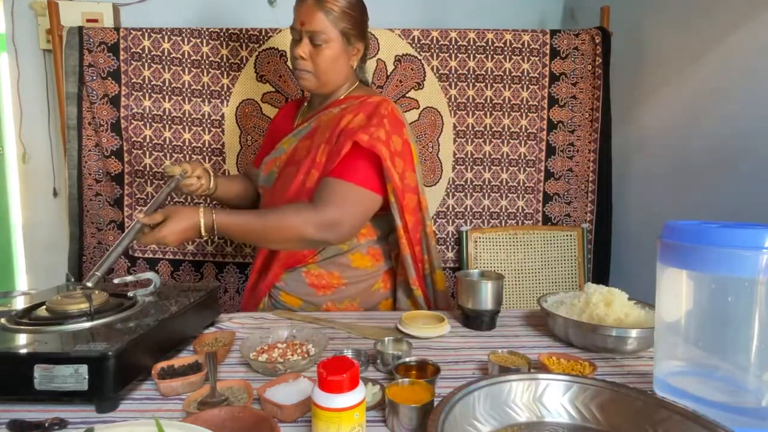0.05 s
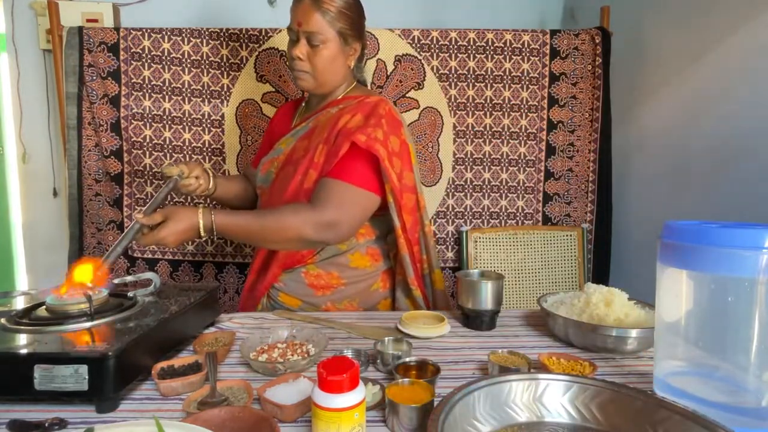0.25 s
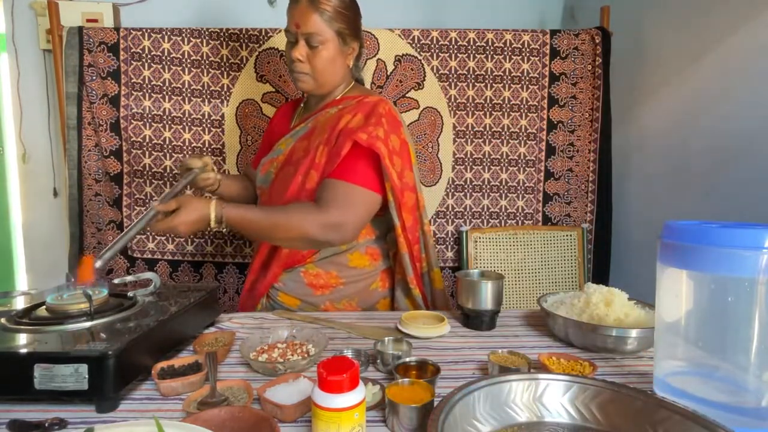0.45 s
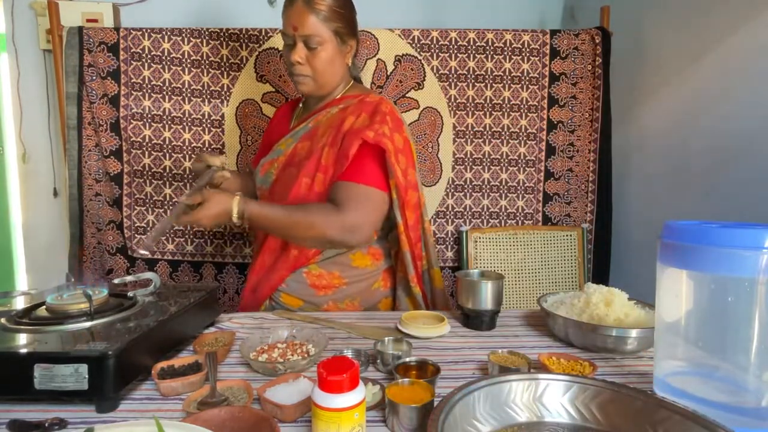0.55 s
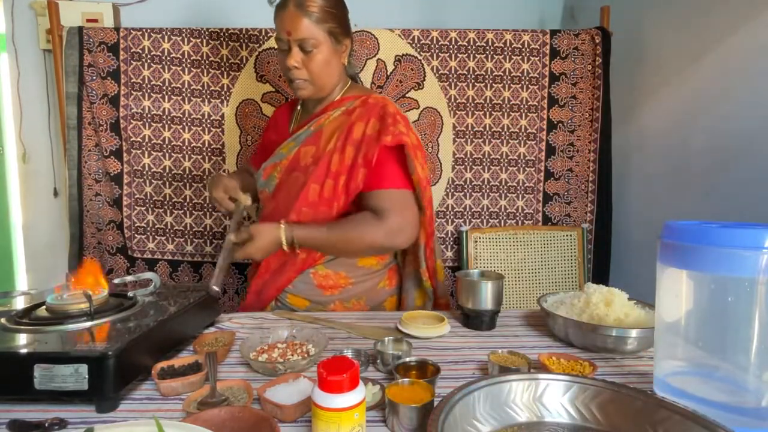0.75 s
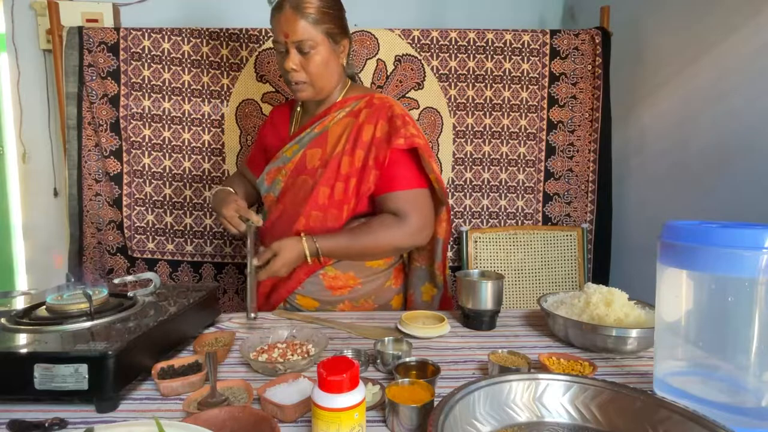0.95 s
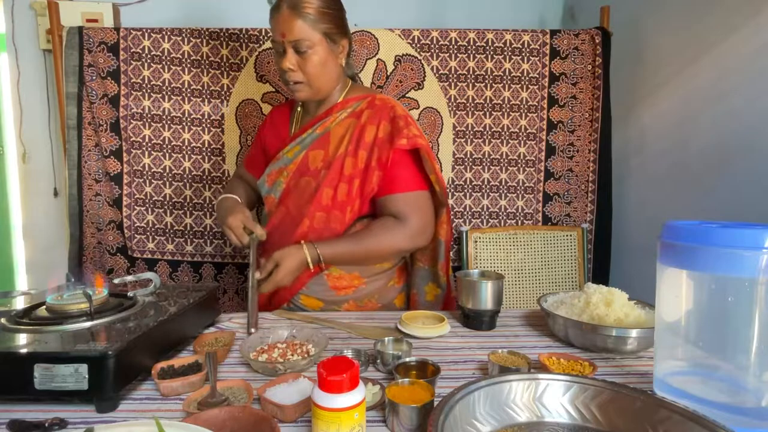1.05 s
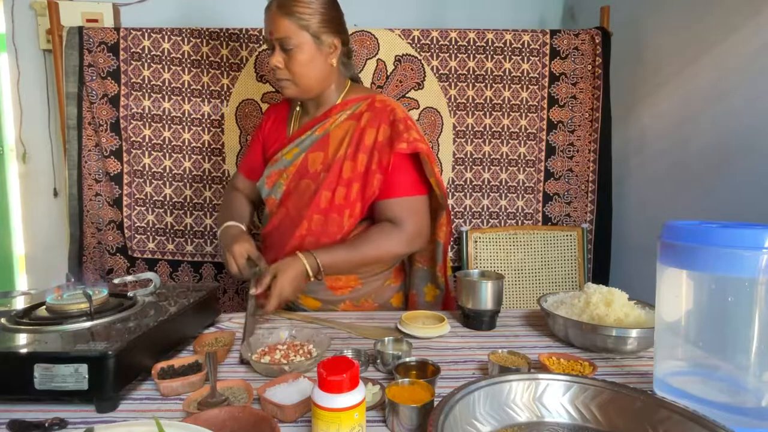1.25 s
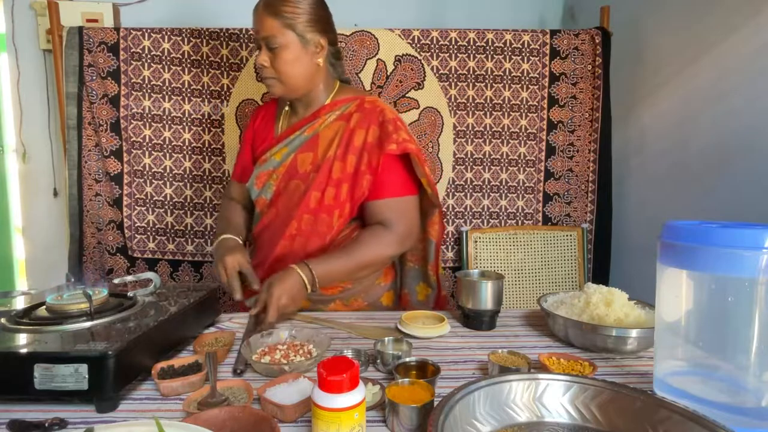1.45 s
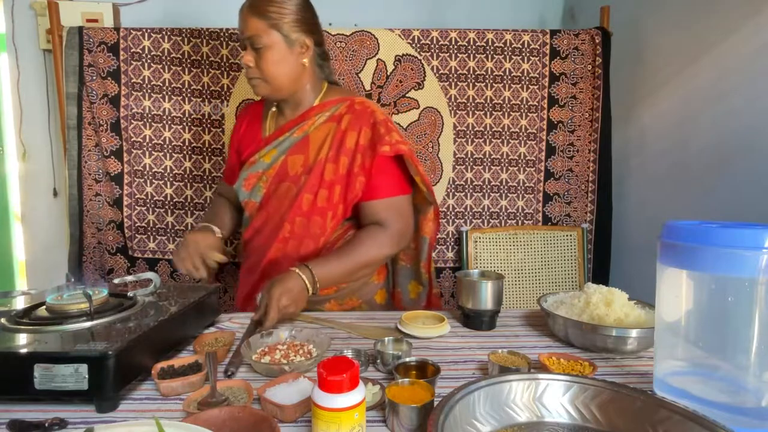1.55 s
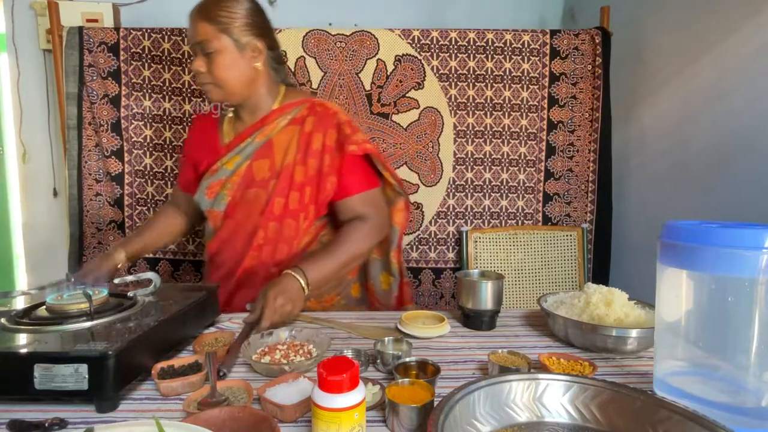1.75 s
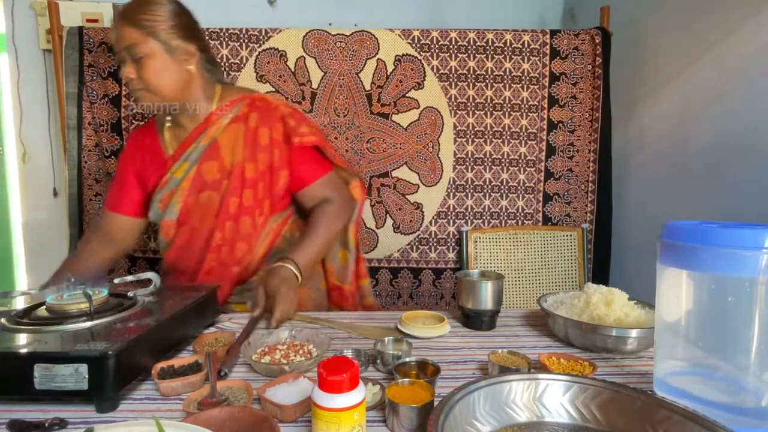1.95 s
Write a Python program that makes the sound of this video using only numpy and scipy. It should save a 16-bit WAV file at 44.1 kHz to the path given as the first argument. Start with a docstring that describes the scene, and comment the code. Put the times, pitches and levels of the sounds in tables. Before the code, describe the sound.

A spark lighter snaps at a gas stove, then clanks down before a ringing steel cookware clink

```python
"""A plunger clicks as a long spark lighter is used at a gas ring in a small, hard-walled kitchen.
Its spring snaps, the gas catches with a soft whump and the lighter clanks back.
Two dull table knocks follow, with a ringing clink of steel cookware between them, then a tink of bangles.
Solid bodies sound as shaped noise for their dense modes and wavering sines for their clear ones.
Each contact's energy feeds the body, which rings down and feeds the room; cloth and hush are coloured noise."""
import sys
import numpy as np
from scipy import signal
from scipy.fft import rfft, irfft
from scipy.io import wavfile

SR = 44100
rng = np.random.default_rng(int(sys.argv[2]) if len(sys.argv) > 2 else 0)


def store_pcm(level_fs):
    """Save levels as 16-bit WAV."""
    pcm = np.round(np.clip(level_fs, -1, 1) * 32767).astype(np.int16)
    wavfile.write(sys.argv[1], SR, np.atleast_2d(pcm).T)


N = 88200
TIME, FREQS = np.arange(N) / SR, np.arange(N // 2 + 1) * SR / N

# the kitchen's reverberation time: (frequency [Hz], t60 [s])
ROOM_T60 = [(90, 0.45), (220, 0.62), (500, 0.49), (1100, 0.57), (2500, 0.46), (6000, 0.43), (9500, 0.4),
            (14000, 0.12)]
CONTACT_S = 0.0044   # usual t60 of the energy a contact delivers

# Contact tables give each level as if the contact's energy were spread over a tenth of a second.


def lighter():
    """Impacts excite modes: the plunger clicks, the spring rattles in its tube, the lighter clanks back."""
    # contacts: (time [s], level [dB])
    clicks = [(.0160, -44), (.0185, -47.5)]
    snaps = [(.2050, -30), (.2105, -34), (.2183, -29), (.2243, -32)]
    clanks = [(.7364, -28.5), (.7422, -34), (.7475, -27.5)]
    # colour of the dense modes: (frequency [Hz], density [dB per Hz])
    plunger_colour = [(280, -3.5), (400, 1.5), (5000, -7.5), (7500, -13.5), (9000, -13), (12500, -17),
                      (15500, -46.5)]
    spring_colour = [(150, -10), (600, -13), (1000, -11.5), (1500, -20.5), (3000, -12), (4100, -12.5),
                     (4800, -5.5), (6950, -3), (7500, -21.5), (8700, -5), (10200, -16.5), (12200, -13),
                     (16000, -33)]
    clank_colour = [(70, -42), (150, -8), (420, -3), (650, -3.5), (1800, -4), (5000, -15.5), (7000, -13.5),
                    (7500, -26.5), (8200, -9.5), (9800, -31.5), (10700, -16.5), (12500, -19.5),
                    (15500, -42.5)]
    # clear modes: (frequency [Hz], level relative to the contact [dB], t60 [s])
    spring_modes = [(4786, -16, 0.17), (6180, -20.5, 0.17), (6970, -12, 0.32), (6982, -14, 0.18)]
    clank_modes = [(222, -12, 0.34), (402, -7.5, 0.11), (484.8, -6, 0.15), (783, -10.5, 0.18),
                   (1435, -16.5, 0.15), (1760, -12, 0.42), (3073, -17.5, 0.08)]

    click = clatter(clicks, plunger_colour, ring_s=0.011, room_db=2, pan_db=0.5)

    # the hard first strike of the spring's hammer
    crack_s = 0.0031
    crack = clatter(snaps[:1], spring_colour, ring_s=crack_s, room_db=-6.5, pan_db=2.5,
                    contact_s=crack_s)
    crack = from_db(-3.5) * crack

    snap = clatter(snaps, spring_colour, ring_s=0.2, room_db=0, pan_db=2.0, low_lag=0.86)
    snap = snap + ring(snaps, spring_modes, room_db=-4.5, pan_db=8.5)

    clank = clatter(clanks, clank_colour, ring_s=0.18, room_db=-3.5, pan_db=1.5, low_lag=0.13)
    clank = clank + ring(clanks, clank_modes, room_db=-6, pan_db=2.0)
    return click + crack + snap + clank


def flame():
    """Sudden combustion: the gathered gas catches just after the spark with a low, swelling whump."""
    # colour of the whump: (frequency [Hz], density [dB per Hz])
    whump_colour = [(35, -5), (120, -9.5), (240, 1), (320, -19.5), (3000, -55)]
    catch_s, level_db, swell_s = 0.208, -45, 0.04
    return clatter([(catch_s, level_db)], whump_colour, ring_s=0.26, room_db=0, pan_db=5.5,
                   contact_s=swell_s, low_lag=0.053)


def cookware():
    """Modal ringing: a steel vessel is struck and bounces once; here and there metal only brushes metal."""
    # strike and bounce, then touches so light that one thin tone sounds: (time [s], level [dB])
    strikes = [(1.1984, -33.5), (1.2440, -48)]
    grazes = [(1.050, -68.5), (1.945, -74)]
    # brushes: (time [s], level [dB], pitch [Hz], spread [frequency ratio], t60 of the contact [s])
    brushes = [(0.395, -51.5, 2635, 1.18, 0.033), (1.745, -64, 1060, 1.85, 0.086)]
    # colour of the vessel's dense modes: (frequency [Hz], density [dB per Hz])
    steel_colour = [(100, -17), (400, -2), (1000, 2), (2600, -6), (3400, -4.5), (4200, -19.5),
                    (8400, -12.5), (12700, -12), (13600, -45)]
    # clear modes, main note and thin tone: (frequency [Hz], level relative to the contact [dB], t60 [s])
    steel_modes = [(643, -15, .3), (1176, -8, 0.17), (3340, -4, 0.032), (5070, -5.5, 0.099),
                   (6070, -26.5, .05), (7170, -17, 0.065), (8247, -13, 0.1), (9560, -13.5, .07),
                   (11120, -8, 0.018), (12350, -1, 0.042)]
    main_note = [(1773.5, 5.5, 0.25)]
    thin_tone = [(3350, -0.5, 0.38)]

    clink = clatter(strikes, steel_colour, ring_s=0.0051, room_db=5.0, pan_db=-0.5)
    clink = clink + ring(strikes, steel_modes, room_db=-4, pan_db=5)
    clink = clink + ring(strikes, main_note, room_db=6.5, pan_db=3.5)   # swells in the room
    clink = clink + ring(grazes, thin_tone, room_db=0, pan_db=1)
    for s, db, hz, spread, length_s in brushes:
        resonance = [(hz / 3, -60), (hz / spread, -16), (hz, 0), (hz * spread, -16), (hz * 3, -60)]
        clink = clink + clatter([(s, db)], resonance, ring_s=0.053, room_db=0.0, pan_db=1.5,
                                contact_s=length_s)
    return clink


def table():
    """Contact stiffness limits bandwidth: the softer a knock on the laden table, the lower its treble ends."""
    # knocks: (time [s], level before the treble is cut [dB], top of the treble [Hz])
    knocks = [(1.142, -44.5, 1020), (1.6046, -42.5, 1530)]
    # colour of the dense modes: (frequency [Hz], density [dB per Hz])
    wood_colour = [(50, -37), (230, -1.5), (450, -4.5), (700, -3), (1300, -19.5)]
    # clear mode: (frequency [Hz], level relative to the contact [dB], t60 [s])
    wood_modes = [(220.8, -3, 0.15)]
    out = 0
    for s, db, top_hz in knocks:
        knock = clatter([(s, db)], wood_colour, ring_s=0.038, room_db=4, pan_db=0.5)
        knock = knock + ring([(s, db)], wood_modes, room_db=-3.5, pan_db=-1)
        soften = signal.butter(8, top_hz, fs=SR, output="sos")
        out = out + signal.sosfilt(soften, knock)
    return out


def bangles():
    """Modal ringing of small rings: clear high tones over a short, fainter touch of dense modes."""
    # touch: (time [s], level [dB])
    tinks = [(1.6735, -48.5)]
    # clear modes: (frequency [Hz], level relative to the contact [dB], t60 [s])
    bangle_modes = [(3200, -22, 0.069), (4550, -27, .05), (5930, -3.5, 0.081), (6820, -15.5, 0.06),
                    (8590, -9.5, 0.081), (9400, -12.5, 0.075), (12770, -16, 0.024)]
    # colour of the touch: (frequency [Hz], density [dB per Hz])
    touch_colour = [(4000, -30), (9000, -18), (13000, 8), (16000, -34)]
    touch = clatter(tinks, touch_colour, ring_s=0.009, room_db=3, pan_db=2)
    return ring(tinks, bangle_modes, room_db=6, pan_db=1.5) + from_db(-8) * touch


def cloth():
    """Friction noise: cloth moving with the arm is broadband noise under smooth swells."""
    # rustles: (time of the peak [s], peak level [dB], half length, one standard deviation [s])
    rustles = [(0.582, -66, .045), (1.098, -65.5, 0.028)]
    # colour of the rustle: (frequency [Hz], density [dB per Hz])
    cloth_colour = [(12000, 3), (15000, -25)]
    swell = sum(from_db(db) * np.exp(-.5 * ((TIME - s) / half) ** 2) for s, db, half in rustles)
    return swell * coloured(cloth_colour)


def room_boom():
    """Room resonance: jolts set the lowest standing waves of the kitchen booming."""
    # jolts: (time [s], level [dB])
    thumps = [(.215, -45), (.745, -48), (1.15, -50), (1.24, -53), (1.61, -54.5)]
    # lowest room modes: (frequency [Hz], level relative to the jolt [dB], t60 [s])
    room_modes = [(92.46, 0, 0.6), (162.9, -1, 0.15)]
    return ring(thumps, room_modes, room_db=5.5, pan_db=0)


def room_hush():
    """Stationary background noise: a steady hush of fixed colour."""
    # colour of the hush: (frequency [Hz], density [dB per Hz])
    hush_colour = [(25, -5.5), (196, -2), (326, -14), (383, -1.5), (515, -23), (2900, -30), (12100, -31),
                   (15000, -54.5)]
    return from_db(-61.5) * coloured(hush_colour, pan_db=1.5)


def clatter(contacts, spectrum, ring_s, room_db, pan_db, contact_s=CONTACT_S, low_lag=.5):
    """High modal density: modes merge into noise with t60 ring_s at 1 kHz, longer the lower they are."""
    # dense modes bunch into random peaks and gaps, wider at higher frequencies
    ragged_db, width_at_1khz_hz = 4.0, 30
    place = 2 * np.sqrt(1000 * FREQS) / width_at_1khz_hz
    bunches = from_db(ragged_db * np.interp(place, np.arange(N), rng.standard_normal(N)))
    noise = rms_one(irfft(rfft(coloured(spectrum, pan_db)) * bunches, N))
    modes = rfft(noise)

    # overlapping bands that add up to the whole, each with its own decay
    centres = [hz for hz, _ in ROOM_T60]
    out = 0
    for hz, share in zip(centres, np.eye(len(centres))):
        band = irfft(modes * at_hz(list(zip(centres, share)), FREQS), N)
        band_ring_s = ring_s * (hz / 1000) ** -low_lag
        direct, echoes = energies(contacts, hz, band_ring_s, room_db, contact_s)
        out = out + band * np.sqrt(direct + echoes)
    return out


def ring(contacts, modes, room_db, pan_db):
    """Interference of echoes: a clear mode is pure at the strike and wavers as the echoes take over."""
    # full wavering, reached where only echoes remain; it is faster the higher the tone
    flutter_db, flutter_hz, flutter_share, phase_wander_rad = 1.84, 25, 0.021, 0.81
    out = 0
    for hz, db, t60 in modes:
        # a pure tone's echoes fade in a share of the room's time
        direct, echoes = energies(contacts, hz, t60, room_db, CONTACT_S, tail_share=0.9)
        blur = np.sqrt(echoes / (direct + echoes))
        phase = 2 * np.pi * (hz * TIME + rng.random())
        rate_hz = flutter_hz + flutter_share * hz
        pair = []
        for wave in (np.sin, np.cos):
            flutter = from_db(flutter_db * blur * drift(rate_hz))
            wander = phase_wander_rad * blur * drift(rate_hz)
            pair.append(flutter * wave(phase + wander))
        tone = rms_one(to_ears(*pair, hz, pan_db))
        out = out + from_db(db) * tone * np.sqrt(direct + echoes)
    return out


def energies(contacts, hz, ring_s, room_db, contact_s, tail_share=1):
    """Energy flow: contacts feed the body, which rings down and feeds the room; direct and echoed power."""
    power = np.zeros(N)
    for s, db in contacts:
        power[int(np.clip(s * SR, 0, N - 1))] += from_db(db) ** 2 * SR / 10
    wet = from_db(room_db) ** 2   # echoed energy relative to direct
    rise_cycles = 6   # a body takes some cycles to answer a contact
    driven = die_away(power, contact_s + rise_cycles / hz)
    direct = die_away(driven, ring_s) / (1 + wet)
    echoes = wet * die_away(direct, tail_share * at_hz(ROOM_T60, hz))
    return direct, echoes


def die_away(power, t60):
    """Exponential decay: energy is spread over a tail that falls 60 dB in t60 seconds."""
    keep = from_db(-120 / (max(t60, 1e-4) * SR))   # twice 60, as this gain acts on power
    return signal.lfilter([1 - keep], [1, -keep], power + 1e-20)


def to_ears(mid, side, hz, pan_db):
    """Interchannel coherence: unrelated signals are mixed to left and right with the room's likeness."""
    # between the channels: (frequency [Hz], correlation [-1 to 1], left minus right before pan_db [dB])
    stereo = [(220, 0.91, 1), (470, 0.022, 1), (1290, -0.17, 3.5), (2520, -0.13, 0.5), (5400, 0.0048, 7.5),
              (8300, -0.16, 3.5), (12200, 0.12, -2.5)]
    alike = np.clip(at_hz(stereo, hz), -.99, .99)
    lean = from_db(at_hz(stereo, hz, column=2) + pan_db)
    mid, side = mid * np.sqrt(1 + alike), side * np.sqrt(1 - alike)
    return np.array([(mid + side) * lean, mid - side]) / np.sqrt(1 + lean ** 2)


def coloured(spectrum, pan_db=0):
    """Spectral shaping: stereo white noise is filtered to a given colour, rms 1."""
    mid, side = rfft(rng.standard_normal((2, N)))
    shaped = to_ears(mid, side, FREQS, pan_db) * from_db(at_hz(spectrum, FREQS))
    return rms_one(irfft(shaped, N))


def drift(rate_hz):
    """Low-pass random process: smooth motion with a spread of 1, slower for a lower rate."""
    spectrum = rfft(rng.standard_normal(N)) / (1 + (FREQS / rate_hz) ** 2) ** 2
    return rms_one(irfft(spectrum, N))


def at_hz(points, hz, column=1):
    """Logarithmic pitch axis: a table's column is interpolated over log frequency."""
    points = np.array(points)
    return np.interp(np.log(np.maximum(hz, 1)), np.log(points[:, 0]), points[:, column])


def from_db(db):
    """Decibel law: level to amplitude gain."""
    return 10 ** (np.asarray(db) / 20)


def rms_one(x):
    """Mean power: scale to unit rms."""
    return x / np.sqrt(np.mean(x ** 2) + 1e-20)


def scene():
    """Superposition: all sources add over the boom and the hush of the room."""
    struck = lighter() + flame() + cookware() + table() + bangles()
    return struck + cloth() + room_boom() + room_hush()


def record(dry):
    """Band limiting: a steep elliptic low-pass ends the treble at 16 kHz."""
    low_pass = signal.ellip(10, .1, 90, 16000, fs=SR, output="sos")
    return signal.sosfilt(low_pass, dry)


dry = scene()
out = record(dry)
store_pcm(out)
```